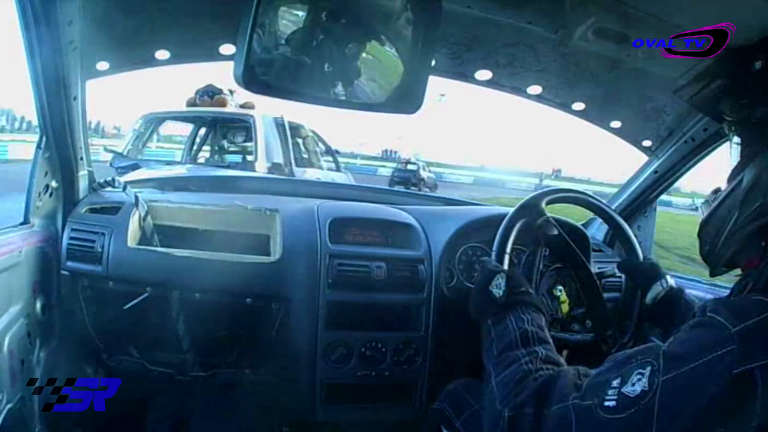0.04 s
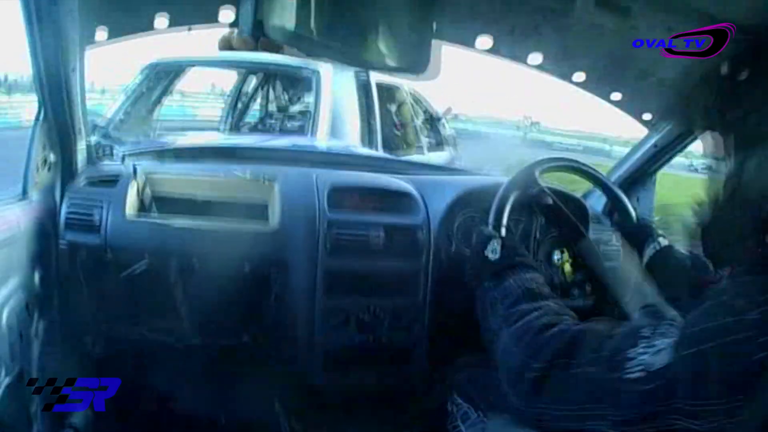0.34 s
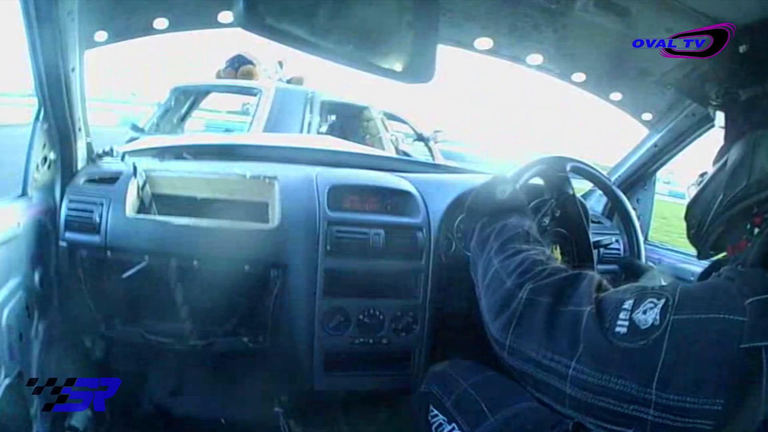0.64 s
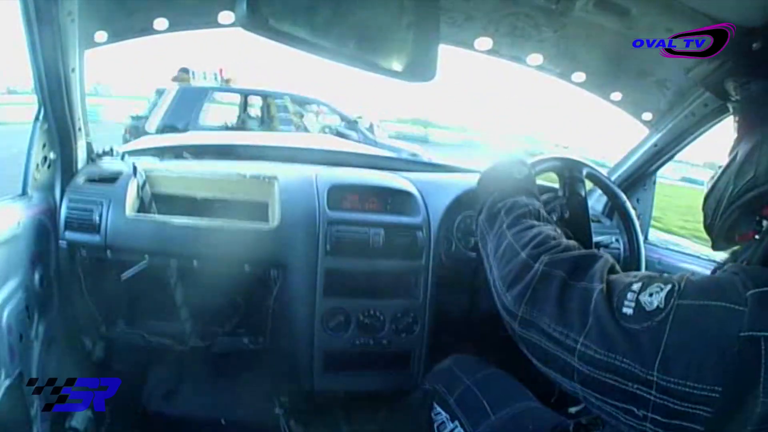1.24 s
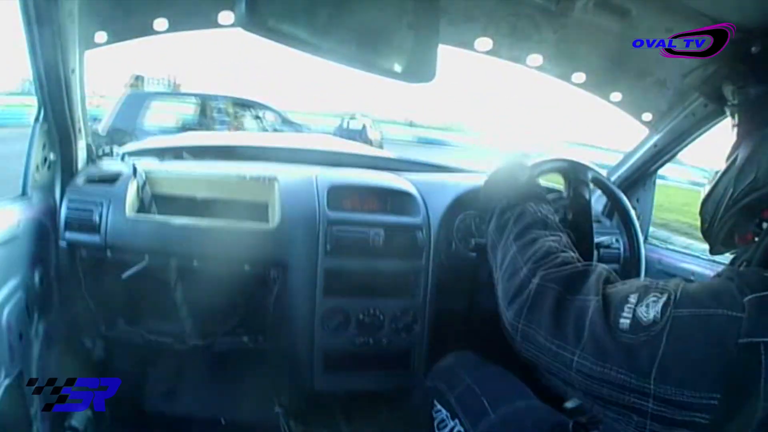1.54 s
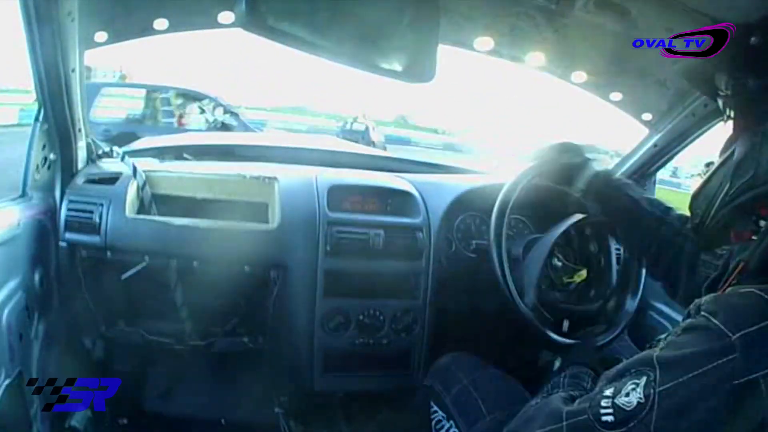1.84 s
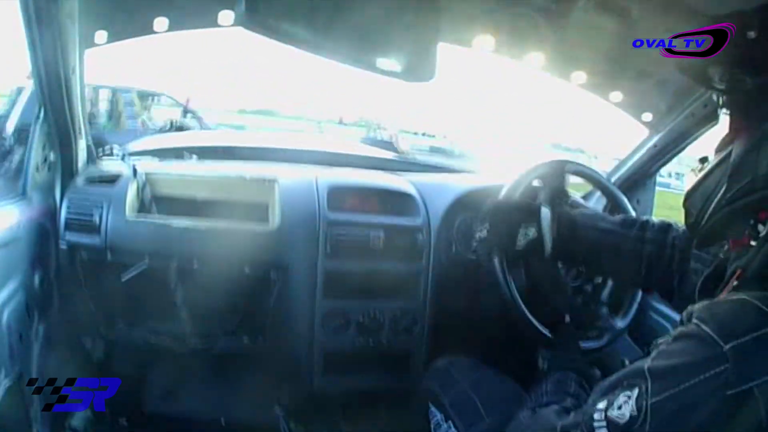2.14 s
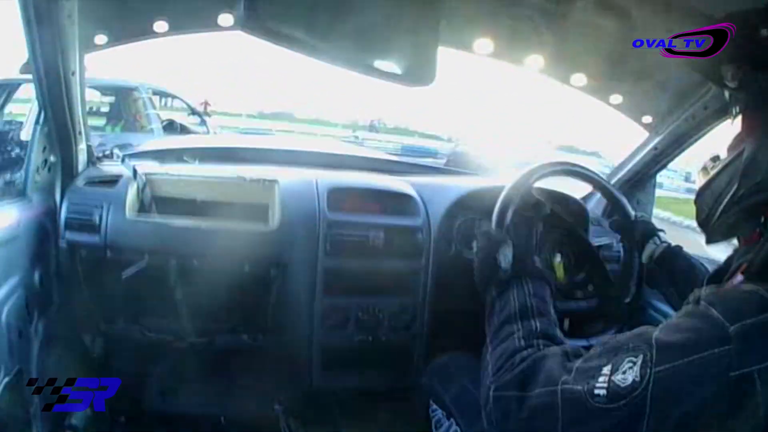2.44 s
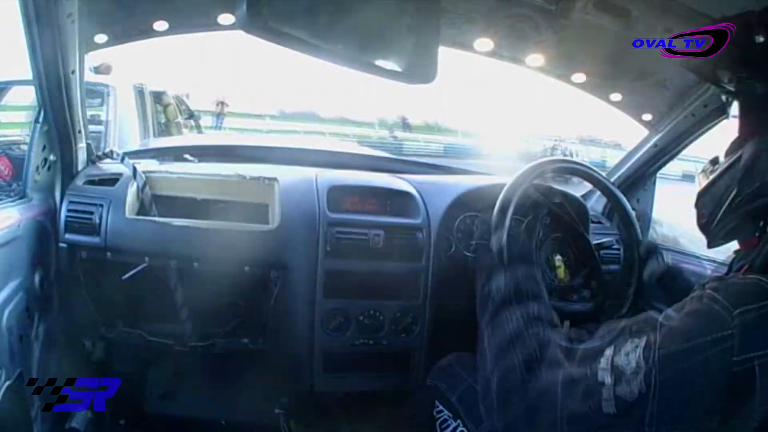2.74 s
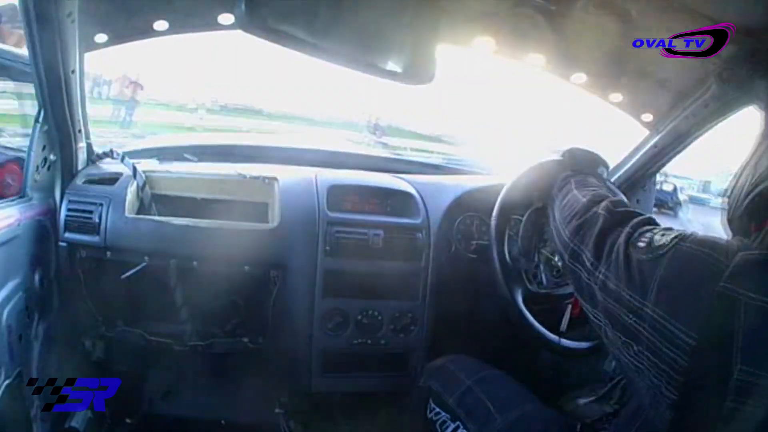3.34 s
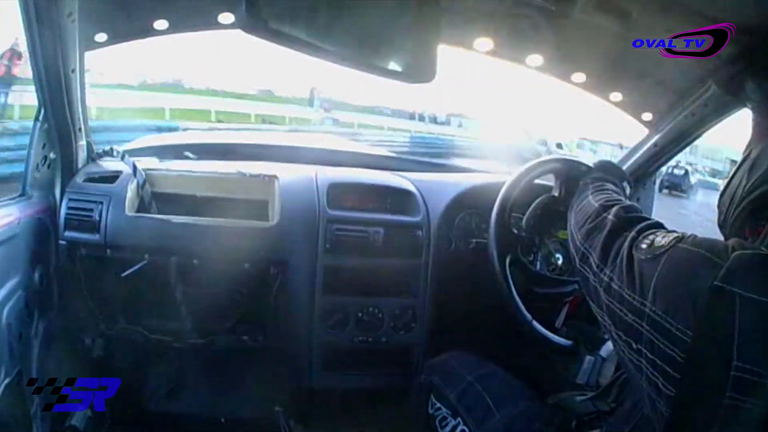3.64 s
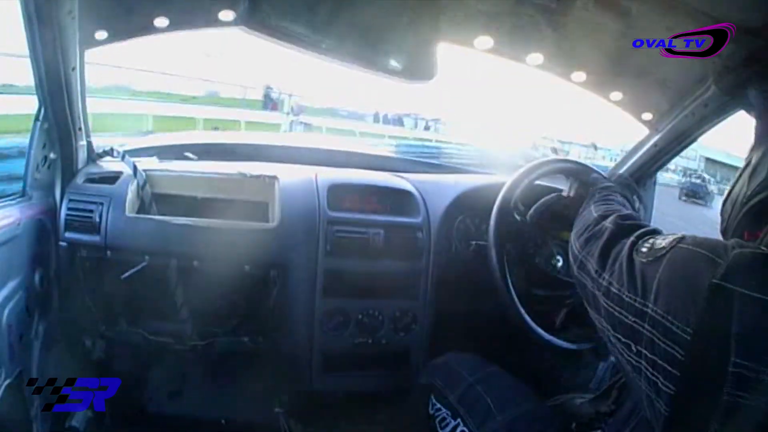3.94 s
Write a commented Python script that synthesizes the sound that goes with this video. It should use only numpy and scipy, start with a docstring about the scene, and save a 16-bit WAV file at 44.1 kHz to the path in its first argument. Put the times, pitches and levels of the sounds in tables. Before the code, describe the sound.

From inside a bare racing car, the engine rises and falls over tyre rumble and buzzing fittings. An early collision overloads the microphone, deep booming and scattered knocks follow, and the engine surges before suddenly going quiet.

```python
"""A four-cylinder engine drones up and down, heard from inside a stripped banger racing car.
Almost at once the car rams another: a bang and a short crunch of panels overload the microphone.
The bare shell booms in the deep bass, its fittings buzz, and bumps rattle the camera housing, with
tyre rumble coming through the floor. Near the end the engine pulls hard, then drops suddenly quiet
as the throttle is lifted."""
import sys
import numpy as np
from scipy import signal
from scipy.fft import rfft, irfft
from scipy.io import wavfile

SR = 44100
rng = np.random.default_rng(int(sys.argv[2]) if len(sys.argv) > 2 else 0)


def log_audio(samples):
    """Write samples as a 16-bit WAV file to the path given in sys.argv[1]."""
    # one column per channel
    frames = np.atleast_2d(samples).T
    # limit to full scale, then quantise
    limited = np.clip(frames, -1, 1)
    pcm = np.round(limited * 32767).astype(np.int16)
    wavfile.write(sys.argv[1], SR, pcm)


N = 176400
T = np.arange(N) / SR


def from_db(db):
    """Decibels to gain."""
    return 10 ** (np.asarray(db) / 20)


def rms_one(x):
    """Scale to unit power."""
    return x / np.sqrt(np.mean(x ** 2) + 1e-20)


def in_time(rows):
    """Each column of a timed curve at every sample."""
    times, *columns = np.transpose(rows)
    return [np.interp(T, times, column) for column in columns]


def drift(hz):
    """Smooth random wander with spread 1, mostly slower than hz."""
    pole = np.exp(-80 * np.pi * hz / SR)
    slow = signal.lfilter([1], [1, -2 * pole, pole * pole], rng.standard_normal(N // 40 + 2002))[2000:]
    return np.interp(np.arange(N) / 40, np.arange(len(slow)), rms_one(slow))


def coloured(points):
    """Unit noise whose spectrum follows (Hz, dB) points and falls steeply beyond them."""
    hz, db = np.transpose(points)
    octave, knots = np.log2(np.maximum(np.arange(N // 2 + 1) * SR / N, 1)), np.log2(hz)
    outside = np.abs(octave - np.clip(octave, knots[0], knots[-1]))
    gain = from_db(np.interp(octave, knots, db) - 100 * outside)
    return rms_one(irfft(rfft(rng.standard_normal(N)) * gain, N))


def resonate(x, hz, width):
    """One resonance, gain 1 at its peak."""
    r = np.exp(-np.pi * width / SR)
    feedback = [1, -2 * r * np.cos(2 * np.pi * hz / SR), r * r]
    return signal.lfilter(np.array([1, 0, -1]) * (1 - r * r) / 2, feedback, x)


def burst(start, t60, rise=.001):
    """A quick rise and an exponential fall of 60 dB in t60 seconds."""
    age = np.maximum(T - start, 0)
    return np.minimum(age / rise, 1) * np.exp(-np.log(1000) * np.minimum(age / t60, 3))


# The engine's revs. Each row: time in seconds, firing rate in Hz.
FIRING_RATE = [(0.0, 107.3), (0.25, 116), (0.35, 116.9), (0.44, 134.5), (0.6, 132.9), (0.82, 120.9),
               (1.1, 114.8), (1.35, 116.4), (1.55, 122.9), (1.78, 135.8), (2.05, 145.6), (2.35, 140.8),
               (2.66, 137.9), (2.88, 125.9), (3.08, 118.7), (3.22, 116.5), (3.35, 119), (3.5, 132),
               (3.6, 133.8), (3.74, 122.9), (4.0, 113.1)]
# The exhaust from inside the car. Each row: time in seconds, levels of harmonics 1, 2 and 3 in dB.
EXHAUST_DRONE = [(0,-35.5,-36.5,-39.5),(.24,-24,-27.5,-40),(.45,-24.5,-32.5,-47.5),(.6,-35.5,-44,-59.5),(.85,-36,-50,-55.5),(1.3,-40,-50,-48.5),(1.5,-32.5,-40.5,-44),(1.8,-29.5,-46.5,-38),(2.05,-31,-43.5,-41.5),(2.3,-29,-40,-40),(2.52,-25,-36.5,-36),(2.64,-39,-36,-34.5),(2.77,-24,-31,-38.5),(3.05,-25.5,-36.5,-42),(3.2,-19.5,-36.5,-42),(3.3,-24.5,-30,-35),(3.42,-19.5,-23,-37.5),(3.6,-22,-26,-36.5),(3.71,-17,-21.5,-45.5),(3.765,-45,-61,-64.5),(4,-36,-63,-58)]
# The weaker orders that make the rasp. Each row: multiple of the firing rate, base level in dB.
RASP_ORDERS = [(1.5,-50.5),(2.5,-41.5),(3.5,-44),(4,-43),(4.5,-47),(5,-47.5),(5.5,-50),(6.5,-48.5),(7.5,-54)]
# The rise and fall of the rasp. Each row: time in seconds, gain in dB.
RASP_GAIN = [(0,-7.5),(.25,-7.5),(.6,-15.5),(1,-12.5),(1.35,-6),(1.7,-12.5),(2.2,-4),(2.6,-3),(3.3,-4.5),(3.5,2),(3.68,3),(3.76,-17.5)]
# How the cabin passes the rasp to the microphone. Each row: frequency in Hz, gain in dB.
CABIN_RESPONSE = [(290,-0.5),(360,-2.5),(460,-4.5),(500,2),(570,-2.5),(660,0),(740,2.5),(860,-2),(1000,3)]
def engine(firing_phase):
    """Three firing harmonics drone; uneven cylinders add orders that glide through cabin resonances."""
    rasp_db, firing_hz = in_time(RASP_GAIN)[0], in_time(FIRING_RATE)[0]
    partials = [(order, db + 2 * drift(14)) for order, db in enumerate(in_time(EXHAUST_DRONE), 1)]
    for order, db in RASP_ORDERS:
        cabin_db = np.interp(order * firing_hz, *np.transpose(CABIN_RESPONSE))
        partials.append((order, db + rasp_db + cabin_db + 3 * drift(16)))
    return sum(np.sqrt(2) * from_db(db) * np.sin(order * firing_phase + 2 * np.pi * rng.random())
               for order, db in partials)


# The bare shell booming all round the microphone. Each row: time in seconds, level in dB.
BOOM_LEVEL = [(0, -26), (0.37, -24.5), (0.45, -18.5), (0.54, -15.5), (0.63, -9), (0.7, -24), (0.76, -22.5),
              (0.82, -13.5), (1.04, -13.5), (1.12, -18), (1.2, -26.5), (1.3, -13.5), (1.6, -11.5),
              (1.65, -26.5), (1.78, -13), (1.9, -21.5), (1.97, -5.5), (2.2, -12.5), (2.29, -4.5),
              (2.47, -11.5), (2.52, -4), (2.66, -16), (2.72, -29.5), (2.8, -24), (2.9, -34.5), (3.2, -24),
              (3.58, -24.5), (3.7, -16), (3.88, -13), (4, -24.5)]
def shell_boom():
    """The shell's lowest resonance wanders, flatter on wide swings; a close neighbour beats with it."""
    boom_hz, neighbour_hz, wander_hz = 38.02, 41.37, 2.2
    swing = np.sqrt(2) * from_db(in_time(BOOM_LEVEL)[0])
    sag_hz = 4 * swing ** 2
    phase = 2 * np.pi * np.cumsum(boom_hz - sag_hz + wander_hz * drift(9)) / SR
    neighbour_phase = 2 * np.pi * np.cumsum(neighbour_hz + 2 * wander_hz * drift(12.4)) / SR
    boom = swing * (np.sin(phase) + from_db(-34.5) * np.sin(2 * phase))
    return boom + np.sqrt(2) * from_db(-29) * np.sin(neighbour_phase)


# The collision, from inside the ramming car. Each row: start in seconds, level in dB,
# treble offset in dB, rise in seconds, 60 dB decay in seconds.
CRASH_BLOWS = [(0.2748,1.5,-6,0.0057,0.048),(0.292,-18,1,0.0015,0.18),(0.309,-26,2.5,0.0017,0.27),(0.319,-18.5,-8,.002,0.044),(0.332,-20,-2,.002,0.06),(0.35,-23,-16.5,0.0016,0.2),(0.381,-22,0,.002,0.045),(0.397,-18.5,-21,.002,0.019)]
# The thud of the body panels. Each row: frequency in Hz, relative level in dB.
PANEL_SPECTRUM = [(90,5),(120,7),(180,-16.5),(255,0),(340,-5),(480,-13),(750,-5),(1050,-10.5),(1500,-7)]
def crunch():
    """Each blow rattles the camera housing; the panels thud a little sooner and ring longer."""
    force = sum(from_db(db - 1) * burst(start - .0024, 1.3 * t60, rise)
                for start, db, _, rise, t60 in CRASH_BLOWS)
    return housing_rattle(CRASH_BLOWS, grain_db=-.5) + force * coloured(PANEL_SPECTRUM)


def crack():
    """First contact gives a very short, bright snap."""
    hiss = coloured([(4000, 10), (8000, -2), (15000, -27)])
    return from_db(-30) * burst(CRASH_BLOWS[0][0], t60=.013) * hiss


def shudder(start=.328, hz=31.3):
    """The shell makes a few wide, slow swings as the rammed car holds it back."""
    return from_db(1.5) * burst(start, t60=.47, rise=.01) * np.sin(2 * np.pi * hz * (T - start))


# The resonances of the camera housing, right at the microphone.
# Each row: frequency in Hz, width in Hz, gain in dB.
HOUSING_MODES = [(978,200,-6.5),(1225,170,-5.5),(1520,69,0.5),(1739,64,1),(1998,140,-1),(2280,400,-5.5),(2984,330,-3),(3403,140,-4),(3870,160,-1),(4110,390,-0.5),(5320,500,-14)]
def housing_rattle(blows, grain_db):
    """Each blow is a dying chatter of contacts that rings the camera housing."""
    middle = sum(from_db(db) * burst(start, t60, rise) for start, db, _, rise, t60 in blows)
    treble = sum(from_db(db + tilt) * burst(start, t60, rise) for start, db, tilt, rise, t60 in blows)
    chatter = rms_one(rng.standard_normal(N) * from_db(grain_db * drift(380)))
    out = 0
    for k, (hz, width, db) in enumerate(HOUSING_MODES):
        ring = resonate(chatter * (treble if hz > 2700 else middle), hz, width)
        out += (-1) ** k * from_db(db) * np.sqrt(SR / (2 * np.pi * width)) * ring
    return out


# Hollow panels knocking around the cabin. Each row: start in seconds, level in dB, pitch in Hz.
PANEL_CLONKS = [(0.274,-2.5,1422),(0.395,-17,1014),(0.596,-15.5,1540),(1.235,-25,1050),(2.0,-22.5,1700),(2.669,-15,1580),(3.623,-12.5,1625),(3.878,-24.5,1388),(3.892,-26.5,985)]
def clonks(rise=.0045, t60=.064):
    """Each hollow panel rings briefly at an unsteady pitch and makes the camera housing chatter."""
    unsteady_time = np.cumsum(1 + .055 * drift(100)) / SR
    rings = sum(from_db(db) * burst(start, t60, rise) * np.sin(2 * np.pi * hz * unsteady_time)
                for start, db, hz in PANEL_CLONKS)
    dull_blows = [(start, db - 5.5, -14.5, rise, t60) for start, db, _ in PANEL_CLONKS]
    return rings + housing_rattle(dull_blows, grain_db=2)


# Knocks close to the microphone. Each row: start in seconds, level in dB, treble offset in dB,
# rise in seconds, 60 dB decay in seconds.
BUMP_KNOCKS = [(.636,-24,-6,0.0029,0.039),(.694,-19.5,-4.5,0.0019,0.067),(.763,-25.5,-3,0.0028,0.043),(.822,-25,-9.5,0.0037,0.08),(1.044,-21.5,-2.5,0.0014,0.045),(3.1055,-7.5,-2,0.0025,0.013),(3.192,-21.5,-2.5,0.002,0.052),(3.623,-16,-2.5,.004,0.11),(3.774,-20.5,2,0.0034,0.058),(3.995,-9,-8,0.0028,0.055)]
def knocks():
    """Bumps jolt the camera housing into short, grainy rattles."""
    return housing_rattle(BUMP_KNOCKS, grain_db=4.5)


# The buzz inside the cabin. Each row: time in seconds, midrange level in dB, treble level in dB.
BUZZ_LEVELS = [(0,-34,-38.5),(.42,-32.5,-42),(.53,-35,-42.5),(.8,-33,-42),(.97,-36.5,-45.5),(1.2,-33,-44.5),(1.38,-31.5,-40),(1.7,-32.5,-41),(2.05,-32,-41.5),(2.5,-33,-40.5),(2.8,-36,-44),(3.3,-34,-40),(3.5,-28.5,-38.5),(3.63,-25.5,-36),(3.8,-32.5,-40.5),(3.98,-33.5,-46)]
# The tone of those two bands. Each row: frequency in Hz, relative level in dB.
BUZZ_MIDDLE = [(600,-16),(800,-10),(950,-5.5),(1380,-4.5),(1510,3),(1740,4.5),(2070,-5),(2170,-4),(2800,-19.5)]
BUZZ_TREBLE = [(2700,-26),(3100,-7),(3300,-1),(3480,4.5),(3720,-7.5),(3930,0),(4190,-4),(4540,-16.5),(5300,-20.5),(5800,-32)]
def buzz(firing_phase):
    """Fittings shaken by the engine pulse with the crank and flutter unevenly."""
    middle_db, treble_db = in_time(BUZZ_LEVELS)
    flutter_db = drift(29)
    middle = from_db(middle_db + flutter_db) * coloured(BUZZ_MIDDLE)
    treble = from_db(treble_db + .87 * flutter_db) * coloured(BUZZ_TREBLE)
    pulse = (np.sin(firing_phase) + np.sin(firing_phase / 2)) / 2
    return (middle + treble) * (1 + .069 * pulse)


# A loose metal part, faint in the cabin. Each row: start in seconds, level in dB.
CLINK_STRIKES = [(0.698,-45),(1.046,-40.5),(3.195,-37),(3.778,-33.5)]
# Its modes. Each row: frequency in Hz, gain in dB, 60 dB decay in seconds.
METAL_MODES = [(2353,-5,.26),(2836,-9,.3),(3070,-6,.12),(4020,-5,.2),(4150,-1,.12),(4465,-4,.09)]
def clinks(bounce_s=.013, bounce_db=3):
    """The loose part is struck and bounces once; its modes ring at varying strength and rattle."""
    bounces = [(start + bounce_s, db + bounce_db) for start, db in CLINK_STRIKES]
    out = 0
    for start, db in CLINK_STRIKES + bounces:
        for hz, mode_db, t60 in METAL_MODES:
            strength = from_db(db + mode_db + 1.5 * rng.standard_normal())
            out += strength * burst(start, t60) * np.sin(2 * np.pi * hz * (T - start))
    return out * rms_one(from_db(2 * drift(120)))


# The track under the car. Each row: time in seconds, level in dB.
TYRE_LEVEL = [(0,-31.5),(.25,-29),(.45,-35),(1.3,-34),(2,-30.5),(2.9,-33.5),(3.65,-37.5),(3.8,-33.5)]
# Its tone from above the floor. Each row: frequency in Hz, relative level in dB.
TYRE_SPECTRUM = [(18,-2),(45,2.5),(80,-6),(150,-4),(220,-14),(400,-20.5),(700,-23.5),(1200,-42.5)]
def tyres():
    """Tyres rolling on the track rumble through the floor."""
    return from_db(in_time(TYRE_LEVEL)[0]) * coloured(TYRE_SPECTRUM)


def scene(top_hz=6020):
    """The mix is low-passed steeply at 6 kHz; only the bright snap of first contact reaches higher."""
    firing_hz = in_time(FIRING_RATE)[0] * (1 + .0049 * drift(18.5))
    firing_phase = 2 * np.pi * np.cumsum(firing_hz) / SR
    mix = tyres() + engine(firing_phase) + shell_boom() + buzz(firing_phase)
    mix += knocks() + crunch() + shudder() + clonks() + clinks()
    low_passed = signal.sosfilt(signal.ellip(8, .5, 70, top_hz, fs=SR, output="sos"), mix)
    return (low_passed + crack())[None]


def record(dry, offset=.073, cutoff_hz=15800):
    """The microphone signal sits off centre and clips at full scale; the top is cut."""
    edge_fade = np.minimum(np.minimum(T, T[-1] - T) / .002, 1)
    clipped = np.clip(dry + offset, -1, 1) * edge_fade
    return signal.sosfilt(signal.cheby2(12, 70, cutoff_hz, fs=SR, output="sos"), clipped)


dry = scene()
out = record(dry)
log_audio(out)
```